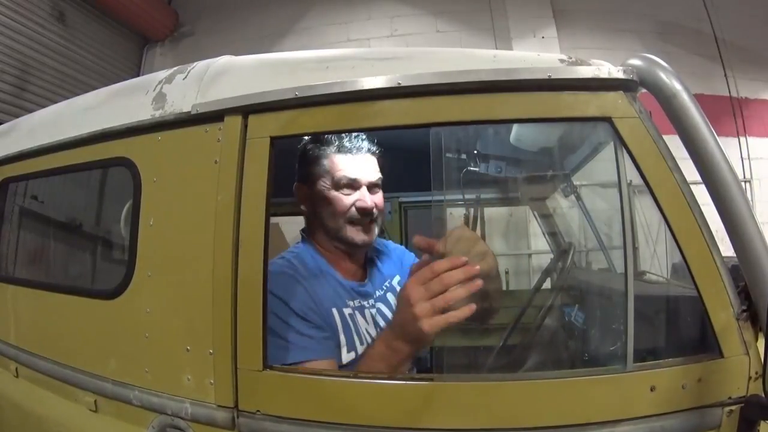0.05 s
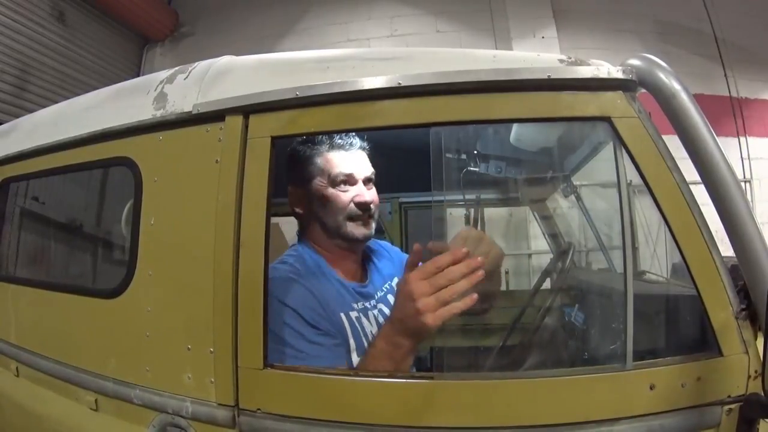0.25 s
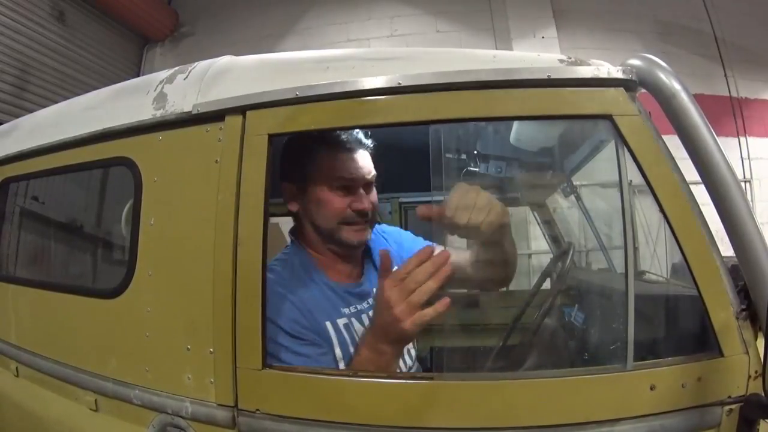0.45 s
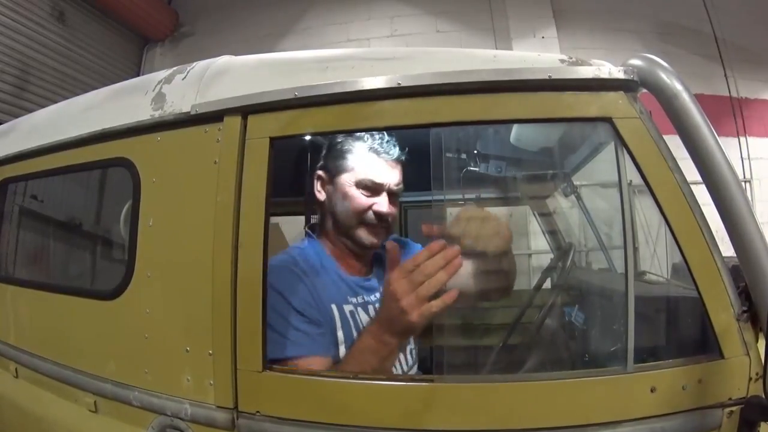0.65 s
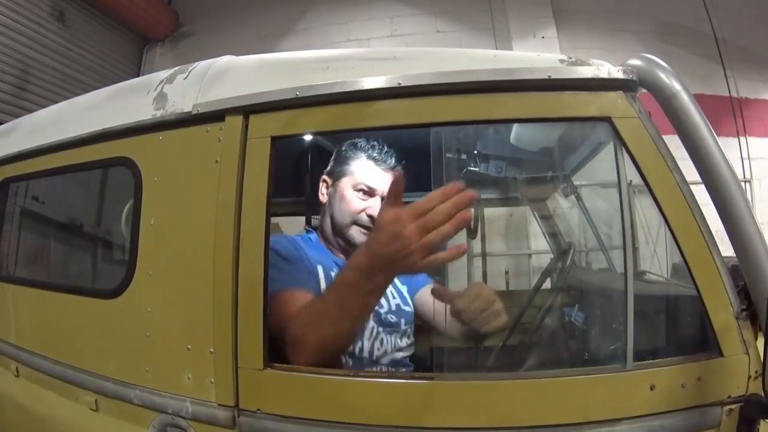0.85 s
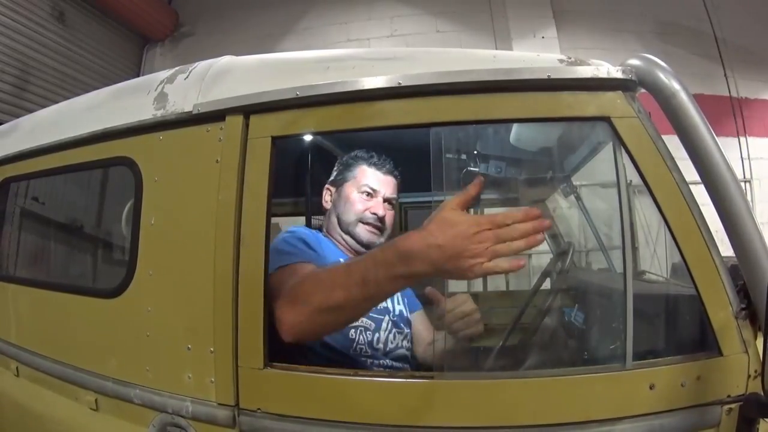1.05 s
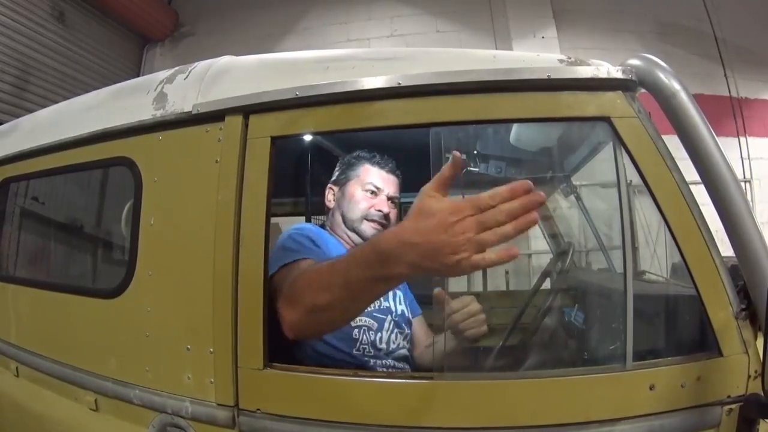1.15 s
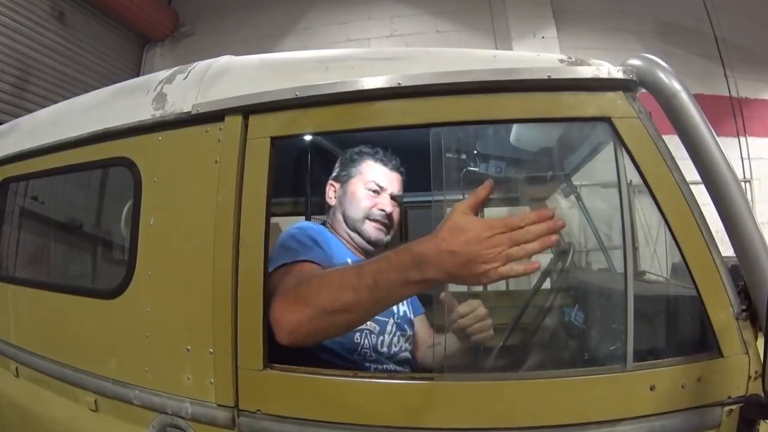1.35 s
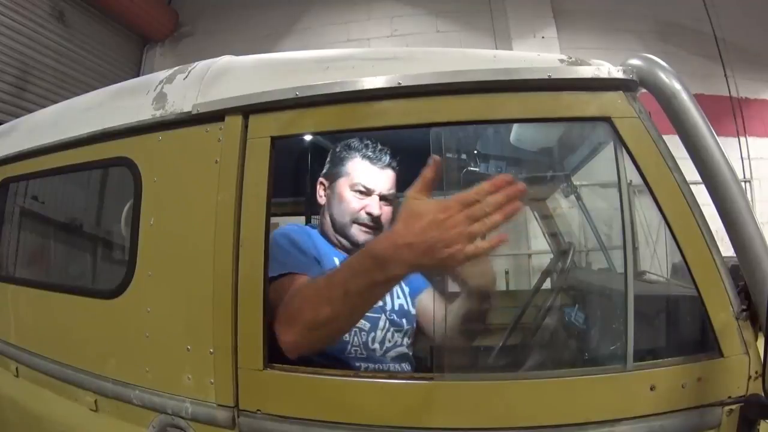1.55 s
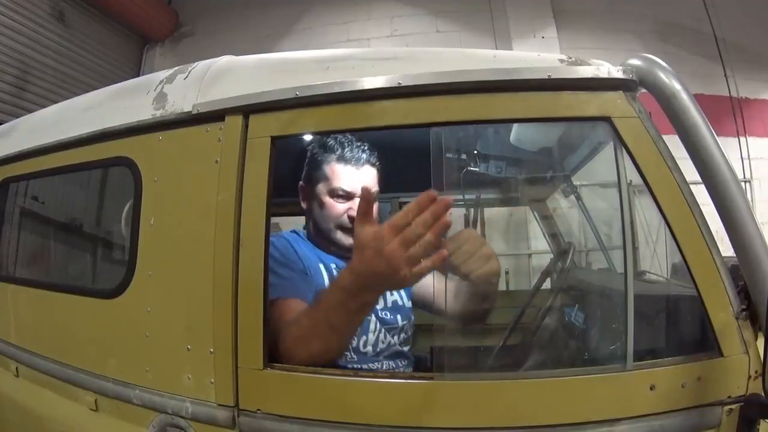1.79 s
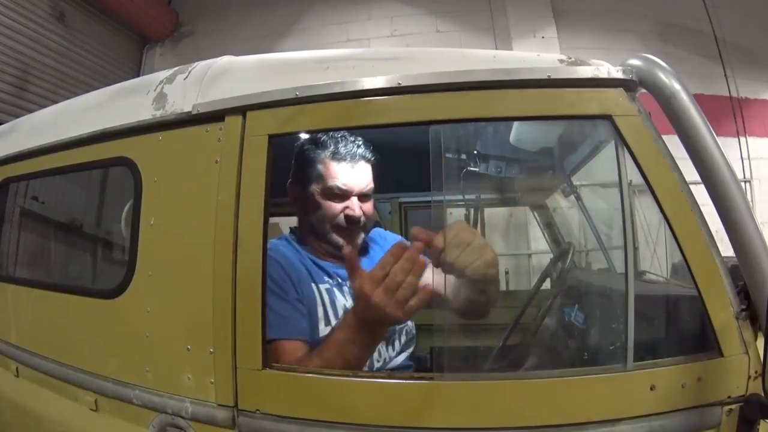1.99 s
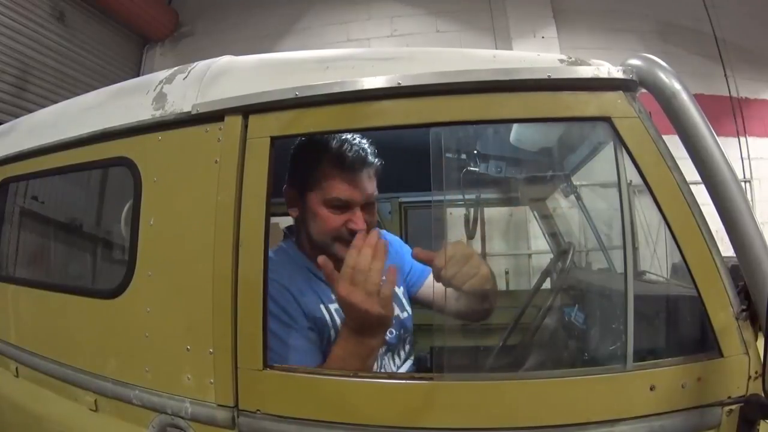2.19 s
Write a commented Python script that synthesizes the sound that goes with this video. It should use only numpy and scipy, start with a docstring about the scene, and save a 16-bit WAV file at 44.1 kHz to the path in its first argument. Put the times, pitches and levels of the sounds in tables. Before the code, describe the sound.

Forceful hand blows on a sliding car window, heard close and slightly right: the first already ringing, then five more, unevenly spaced, with hollow door boom, bright glass rattle and long workshop reverberation over faint room tone.

```python
"""In a large, hard-walled workshop, a hand pounds on the sliding side window of a parked old off-road vehicle.
Each blow is a burst of noise for the slap, fading sine waves for the booming door and a deep noisy shudder.
The loose pane clacks in its channel: short bursts of noise. The hall rings on for about a second as
fading stereo noise, over a steady room tone. The first blow has just fallen when the scene opens."""
import sys
import numpy as np
from scipy import signal
from scipy.fft import rfft, irfft, next_fast_len
from scipy.io import wavfile
from scipy.ndimage import uniform_filter1d, minimum_filter1d

SR = 44100
rng = np.random.default_rng(int(sys.argv[2]) if len(sys.argv) > 2 else 0)


def dump_mix(stems):
    """Bounce the given channels to the path in sys.argv[1] as a 16-bit WAV at rate SR."""
    frames = np.atleast_2d(stems).T  # one column per channel
    limited = np.clip(frames, -1, 1)  # hard clip at full scale
    pcm = np.round(limited * 32767).astype(np.int16)
    wavfile.write(sys.argv[1], SR, pcm)


N = 98078  # length of the scene in samples

# Blows of the hand. Each row: start in seconds, slap level in dB, bass in dB, treble in dB, attack in seconds,
# hall level in dB, hall treble in dB, door ring in dB, body shudder in dB, door pitch the spot favours in Hz.
# All dB values are on top of the general level of that sound.
BLOWS = [(-.055, 3.5, -6, -19, .002, 1.5, -7, -5, -5, 273),
         (.452, -2, -2.5, -1, 0.001, 1.5, -3, 2.5, -1.5, 261),
         (1.018, -2.5, 6.5, 0.5, 0.00013, -2, -9, 1.5, 0.5, 379),
         (1.2735, -2.5, -3, 8.5, 0.00028, 2.5, -4.5, 6, 6, 420),
         (1.682, 0.5, 3, -10, 0.001, -2, -10.5, 4.5, -1, 490), (2, -4, 3, 2, 0.001, 5.5, -7, 2, 2, 278)]

# The slap, a dense ring of glass and panels. Each row: frequency in Hz, relative strength in dB per Hz.
SLAP = [(15, -36), (50, -11), (130, -10), (280, -3.5), (600, 2.5), (1000, -1), (1700, 1.5), (3000, -8.5),
        (5500, -20.5), (10000, -32)]
# How long the slap rings. Each row: frequency in Hz, time to fall by 60 dB in seconds.
SLAP_T60 = [(60, .5), (300, 1), (900, 0.33), (2500, 0.19), (9000, 0.39)]
SLAP_DB, BASS_RISE_S, RING_S = -15, 0.0049, 0.7
BASS_HZ, TREBLE_HZ = 278, 2200  # where the weight and the sharpness of a blow take hold

# Ringing tones of the door and its window. Each row: frequency in Hz, relative level in dB,
# time to fall by 60 dB in seconds.
DOOR = [(115.9, -10.5, 0.44), (134.7, -11, 0.43), (168.8, -9.5, 0.4), (199.8, -7, 0.52), (230, -5, 0.49),
        (245, -5.5, 0.59), (271.9, -0.5, 0.39), (289.2, 1.5, 0.43), (336.4, -3, 0.59), (370.7, -3, 0.4),
        (418, -3, 0.4), (498.4, -2, 0.26), (618.5, -2, 0.16), (647, -0.5, 0.32), (846, -8, 0.23)]
DOOR_DB, DOOR_RISE_S, DOOR_SCATTER_DB = -22, 0.022, 1.5
SPOT_DB, SPOT_OCTAVES = 7.5, 0.1  # lift of the tones that the struck spot favours, and its width

# Shudder of the whole vehicle body. Each row: frequency in Hz, relative strength in dB per Hz.
SHUDDER = [(12, -22), (25, 3), (40, -6), (52, 0), (68, 7.5), (85, 8.5), (130, -8.5), (300, -61),
           (1000, -90)]
SHUDDER_DB, SHUDDER_T60_S, SHUDDER_RISE_S = -41, 0.83, 0.019

# The pane hits its channel. Each row: start in seconds, level in dB on top of the general clack level,
# frequency in Hz above which the clack is dull.
CLACKS = [(0.4574, -2.5, 9000), (0.4614, 2.5, 4300), (.4735, 3.5, 2900), (1.0173, -4, 5740),
          (1.0196, -3, 3500), (1.0294, 2.5, 13000), (1.0467, -8.5, 5940), (1.2771, 1, 3030),
          (1.2812, -2.5, 10400), (1.6877, -2, 6660), (1.691, -8, 8600), (1.705, -9, 11000),
          (1.7416, -0.5, 4570), (1.7716, -5, 4200), (1.805, -5.5, 3310), (2.007, 0, 8740), (2.022, 0, 5900),
          (2.0695, -0.5, 3520)]
# Glass against metal. Each row: frequency in Hz, relative strength in dB per Hz.
CLACK = [(30, -22), (150, -18), (600, 4), (1600, -1.5), (3200, 1), (5200, -2), (6700, 0), (7600, -2.5),
         (8600, 1), (10000, -7.5), (12000, -11)]
CLACK_DB, CLACK_T60_S, CLACK_RISE_S, CLACK_HALL_DB = -10, 0.011, 0.00016, -9.5
CLACK_BODY_HZ, CLACK_BODY_T60_S = 2500, 0.039  # below this the contact rings on a little
# Faint ticks of the pane while it still shakes
CHATTER_DB, CHATTER_SPAN_S, CHATTER_FALL_DB_PER_S = -14.5, 0.17, 50
CHATTER_SCATTER_DB, CHATTER_DULL_HZ = 6, 4040

# How long the hall rings. Each row: frequency in Hz, time to fall by 60 dB in seconds.
HALL_T60 = [(60, 1.37), (250, 1.1), (700, 1.0948), (2000, 1.16), (4000, 1.09), (7000, 0.86), (11000, 0.56)]
# The hall's answer to a blow. Each row: frequency in Hz, relative strength in dB per Hz.
HALL = [(30, -27.5), (90, -11.5), (160, -3), (290, 1), (500, 2), (800, 2), (1300, -2), (2600, -2.5),
        (4000, -7.5), (5000, -11.5), (6000, -17), (9000, -21), (11000, -32.5)]
# Stereo spread of the hall. Each row: frequency in Hz, level of the side signal in dB.
HALL_WIDTH = [(100, -36), (500, -8), (1300, -11), (4000, -11), (10000, -10)]
HALL_DB, HALL_BUILD_S, TAIL_S = -18.5, 0.012, 1.4

# Left minus right near the door. Each row: frequency in Hz, difference in dB.
NEAR_PAN = [(40, 1), (150, 0), (500, -6.5), (1300, -6.5), (3000, -5), (8000, -2)]
# Left minus right in the hall. Each row: frequency in Hz, difference in dB.
HALL_PAN = [(40, -12), (150, -2), (500, -4), (1300, -5), (3000, -2.5), (8000, -0.1)]

# Room tone. Each row: frequency in Hz, relative strength in dB per Hz.
FLOOR = [(10, -20), (30, -2), (70, -31), (300, 20), (1000, -20.5), (4000, -10), (11000, -25)]
FLOOR_DB = -52.5

LIMIT_DB, LIMIT_HOLD_S, TOP_HZ = -1.5, 0.002, 11100


def amp(db):
    """Turn decibels into a gain."""
    return 10 ** (np.asarray(db) / 20)


def unit(x):
    """Scale to an rms level of 1."""
    return x / np.sqrt(np.mean(x ** 2) + 1e-20)


def along(points, hz):
    """Read a curve of (Hz, value) points on a log frequency axis."""
    f, v = np.transpose(points)
    return np.interp(np.log(hz + 1), np.log(f + 1), v)


def seconds(length):
    """A time axis in seconds."""
    return np.arange(int(length * SR)) / SR


def fade_out(t, t60):
    """A steady die-away that falls by 60 dB in t60 seconds."""
    return np.exp(-np.log(1000) * t / t60)


def rise(t, attack_s):
    """A soft start."""
    return 1 - np.exp(-t / attack_s)


def coloured(x, db_at):
    """Filter with the gain db_at(hz), without any sound ahead of its cause."""
    m = 2 * next_fast_len(x.shape[-1] // 2 + 2048)
    cepstrum = irfft(np.log(amp(db_at(np.fft.rfftfreq(m, 1 / SR)))), m)
    # Folding the cepstrum onto its first half gives a minimum-phase filter
    cepstrum[1:m // 2] *= 2
    cepstrum[m // 2 + 1:] = 0
    response = np.exp(rfft(cepstrum))
    return irfft(rfft(x, m) * response, m)[..., :x.shape[-1]]


def shape_db(points, hz):
    """A spectrum in dB that keeps the power of white noise."""
    db = along(points, hz)
    return db - 10 * np.log10(np.mean(amp(db) ** 2))


def lows(x, cutoff_hz):
    """The part below the cutoff, filtered forwards and backwards so that it is not delayed."""
    return signal.sosfiltfilt(signal.butter(2, cutoff_hz, fs=SR, output="sos"), x)


def dying(t60, length):
    """White noise in which each frequency dies at its own speed."""
    n = int(length * SR)
    hz, t, spectrum = signal.stft(rng.standard_normal(n), SR, nperseg=256)
    t60_s = np.maximum(along(t60, hz), 1e-3)[:, None]
    return signal.istft(spectrum * fade_out(t, t60_s), SR)[1][:n]


def panned(pair, pan):
    """Lean a pair of channels to one side, by frequency."""
    left = coloured(pair[0], lambda hz: along(pan, hz) / 2)
    right = coloured(pair[1], lambda hz: -along(pan, hz) / 2)
    return np.array([left, right])


def add(out, s, x):
    """Mix x in at time s, cutting off what lies outside the scene."""
    start = round(s * SR)
    x = x[:, max(-start, 0):N - start]
    out[:, max(start, 0):][:, :x.shape[1]] += x


def pounding():
    """Each blow sounds at the door, mostly to the right, and in the hall."""
    out = np.zeros((2, N))
    for (s, slap_db, bass_db, treble_db, attack_s,
         hall_db, hall_treble_db, ring_db, shudder_db, spot_hz) in BLOWS:
        near = amp(slap_db) * slap(bass_db, treble_db, attack_s)
        near = near + amp(ring_db) * door(spot_hz)
        near = near + amp(shudder_db) * shudder()
        add(out, s, panned([near, near], NEAR_PAN))

        def answer_db(hz):
            return shape_db(HALL, hz) + touch(hz, bass_db, hall_treble_db)

        add(out, s, amp(HALL_DB + hall_db) * hall(answer_db))
    return out


def slap(bass_db, treble_db, attack_s):
    """Countless close tones of glass and panels, as noise; the lows have their own start time."""
    t, ring = seconds(RING_S), dying(SLAP_T60, RING_S)
    low = lows(ring, 2 * BASS_HZ)
    ring = low * rise(t, BASS_RISE_S) + (ring - low) * rise(t, attack_s)
    return amp(SLAP_DB) * coloured(ring, lambda hz: shape_db(SLAP, hz) + touch(hz, bass_db, treble_db))


def touch(hz, bass_db, treble_db):
    """A heavier blow has more bass, a flatter slap more treble."""
    bass = bass_db / (1 + (hz / BASS_HZ) ** 2)
    treble = treble_db * hz ** 2 / (hz ** 2 + TREBLE_HZ ** 2)
    return bass + treble


def door(spot_hz):
    """The door booms in its low tones, with a lift for those that the struck spot favours."""
    t = seconds(RING_S)
    hz, db, t60 = np.transpose(DOOR)[:, :, None]
    octaves_away = np.log2(hz / spot_hz)
    scatter_db = DOOR_SCATTER_DB * rng.standard_normal(hz.shape)
    db = db + scatter_db + SPOT_DB * np.exp(-(octaves_away / SPOT_OCTAVES) ** 2)
    waves = np.sin(2 * np.pi * (hz * t + rng.random(hz.shape)))  # each starts at a random phase
    tones = amp(db) * fade_out(t, t60) * waves
    return amp(DOOR_DB) * tones.sum(0) * rise(t, DOOR_RISE_S)


def shudder():
    """A deep, slowly fading shake of the bodywork, made of low noise."""
    t = seconds(RING_S)
    rumble = unit(coloured(rng.standard_normal(len(t)), lambda hz: along(SHUDDER, hz)))
    return amp(SHUDDER_DB) * rumble * rise(t, SHUDDER_RISE_S) * fade_out(t, SHUDDER_T60_S)


def rattle():
    """The loose pane clacks and chatters after the blows, with a faint echo from the hall."""
    near = np.zeros((1, N))
    for s, db, dull_hz in CLACKS:
        add(near, s, amp(db) * clack(dull_hz)[None])
    # Seven ticks at random moments after each blow, the later ones generally fainter
    for s, db, *_ in BLOWS:
        for delay in CHATTER_SPAN_S * rng.uniform(.1, 1, size=7):
            tick_db = db + CHATTER_DB - CHATTER_FALL_DB_PER_S * delay
            tick_db += CHATTER_SCATTER_DB * rng.standard_normal()
            add(near, s + delay, amp(tick_db) * clack(CHATTER_DULL_HZ)[None])
    tail = hall(np.zeros_like)  # a tail without added colour
    echo = signal.fftconvolve(near, tail / np.linalg.norm(tail[0]), axes=1)[:, :N]
    return panned([near[0], near[0]], NEAR_PAN) + amp(CLACK_HALL_DB) * echo


def clack(dull_hz):
    """A short, hard contact of the pane's edge with its channel: a bright tick over a longer body."""
    t = seconds(RING_S / 10)
    noise = rng.standard_normal(len(t))
    body = lows(noise, CLACK_BODY_HZ)
    tick = noise - body
    crack = tick * fade_out(t, CLACK_T60_S) + body * fade_out(t, CLACK_BODY_T60_S)

    def dulled_db(hz):
        return shape_db(CLACK, hz) - 10 * np.log10(1 + (hz / dull_hz) ** 6)

    return amp(CLACK_DB) * coloured(crack * rise(t, CLACK_RISE_S), dulled_db)


def hall(db_at):
    """Echoes too dense to tell apart: a fresh stereo noise tail of the workshop, coloured by db_at(hz)."""
    tails = np.array([dying(HALL_T60, TAIL_S) for _ in range(2)])
    mid, side = coloured(tails * rise(seconds(TAIL_S), HALL_BUILD_S), db_at)
    side = coloured(side, lambda hz: along(HALL_WIDTH, hz))
    return panned([mid + side, mid - side], HALL_PAN)


def room_tone():
    """The steady, faint background: noise shaped by frequency."""
    noise = rng.standard_normal(N)
    tone = amp(FLOOR_DB) * unit(coloured(noise, lambda hz: along(FLOOR, hz)))
    return panned([tone, tone], HALL_PAN)


def scene():
    """Blows, the rattling pane and the room tone."""
    return pounding() + rattle() + room_tone()


def record(dry):
    """A limiter holds down the highest peaks; a steep filter cuts the top of the treble."""
    hold = max(int(LIMIT_HOLD_S * SR), 2)
    needed = np.minimum(1, amp(LIMIT_DB) / (np.abs(dry).max(0) + 1e-9))
    limited = dry * uniform_filter1d(minimum_filter1d(needed, hold), hold)
    m = next_fast_len(N + SR // 2)
    gain = 1 / np.sqrt(1 + (np.fft.rfftfreq(m, 1 / SR) / TOP_HZ) ** 120)
    return irfft(rfft(limited, m) * gain, m)[:, :N]


dry = scene()
out = record(dry)
dump_mix(out)
```